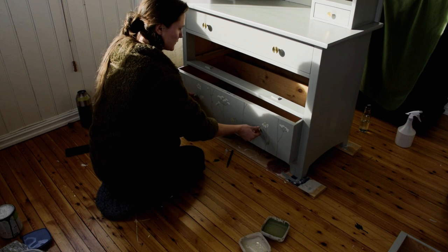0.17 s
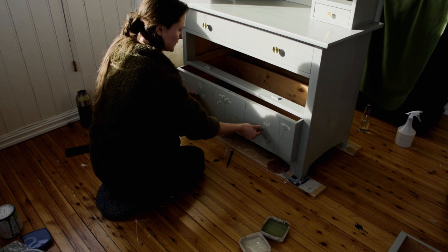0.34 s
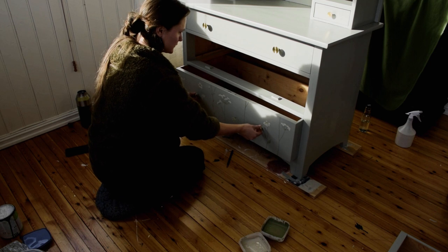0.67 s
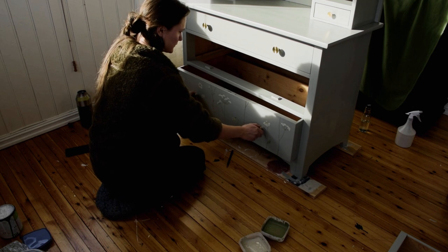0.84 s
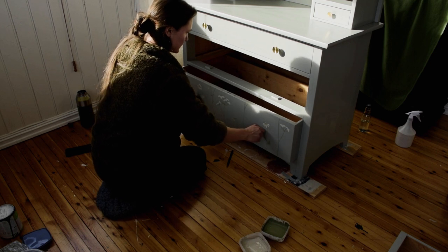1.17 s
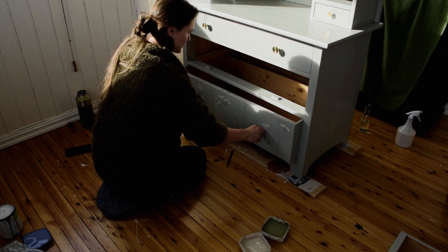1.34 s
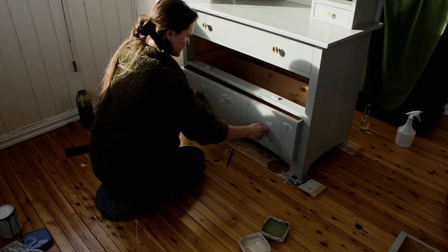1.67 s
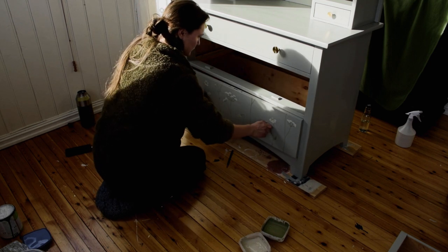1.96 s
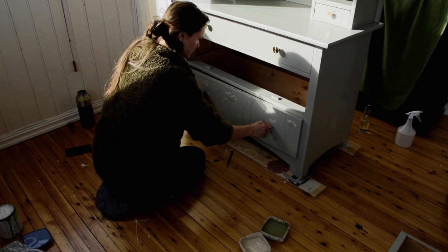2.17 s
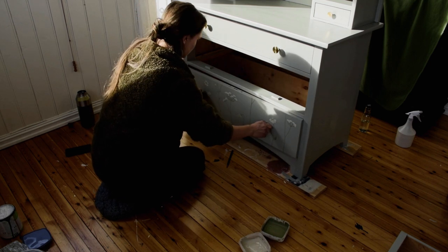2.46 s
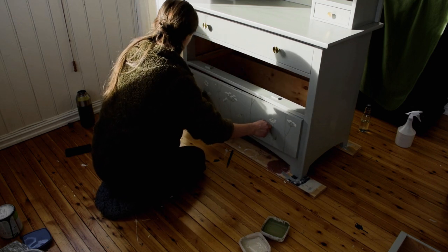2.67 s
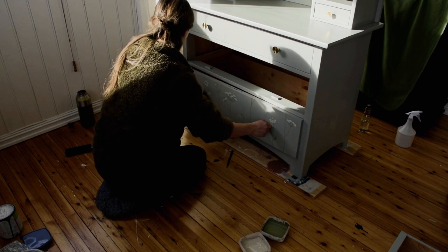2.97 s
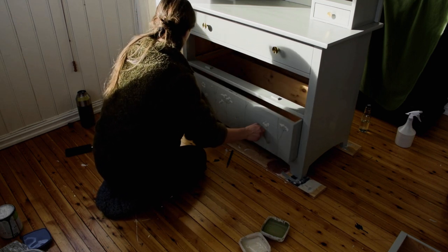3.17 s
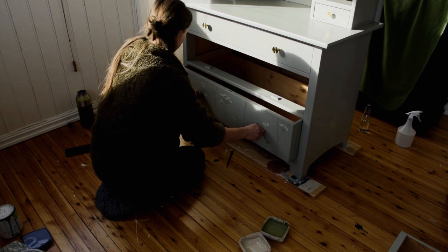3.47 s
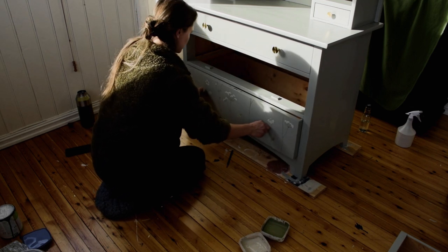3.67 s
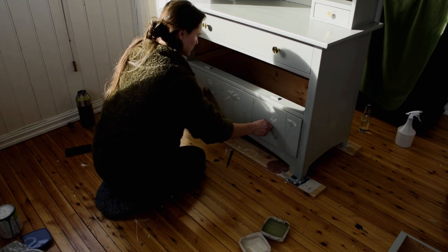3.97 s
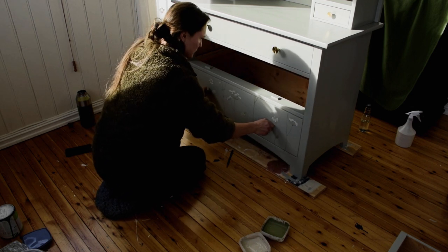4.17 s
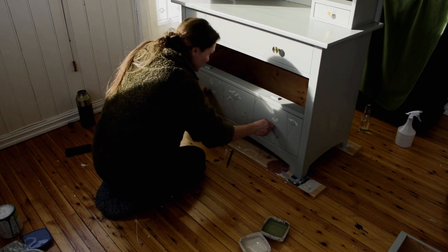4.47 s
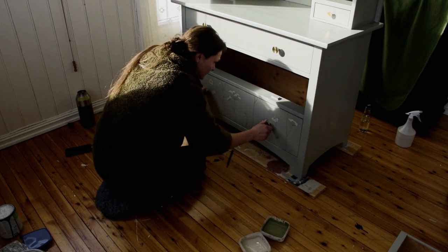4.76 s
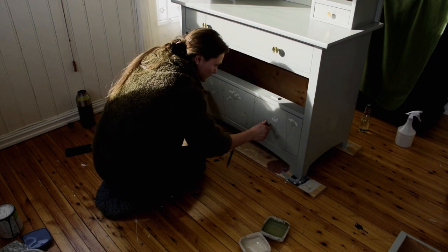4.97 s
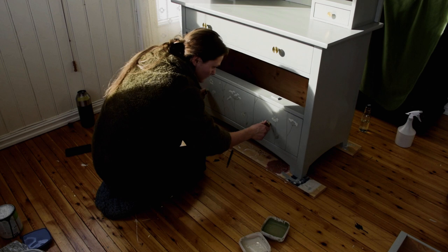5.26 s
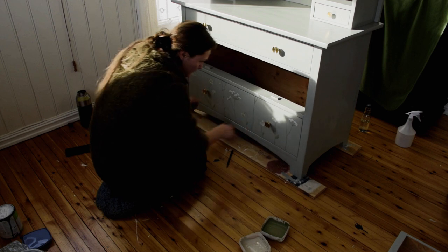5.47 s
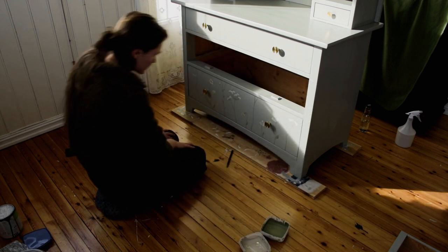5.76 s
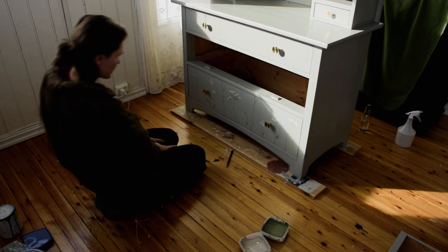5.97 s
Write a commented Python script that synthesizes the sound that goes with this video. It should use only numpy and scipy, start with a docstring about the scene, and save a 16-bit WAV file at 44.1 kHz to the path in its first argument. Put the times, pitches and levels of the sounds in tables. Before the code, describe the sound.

A wooden drawer is pushed and pulled in a hollow dresser in a quiet, board-floored room. Short dry scrapes and dull bumps come first, then sharp clacks and heavy thuds in uneven bursts, hardest between one and four seconds. Softer knocks and small taps follow, then a faint cloth brush. The microphone is a few steps away, with short room reverberation and soft steady hiss.

```python
"""A wooden drawer is pushed and pulled by its knobs in a dresser, in a quiet, bare room with a board floor.
From the start it scrapes on its runners by stick-slip, judders and thuds into the hollow carcass,
whose damped modes ring, and clacks against the frame in broadband snaps that ring its edges; the hardest
blows fall between one and four seconds. Lighter knocks follow, then cloth brushes by as smooth noise.
Steady hiss lies beneath, and the walls return a decaying noise tail."""
import sys
import numpy as np
from scipy import signal
from scipy.fft import rfft, irfft, next_fast_len
from scipy.io import wavfile
from scipy.ndimage import map_coordinates

SR = 44100
rng = np.random.default_rng(int(sys.argv[2]) if len(sys.argv) > 2 else 0)


def waveform_to_disk(signal):
    """Save audio, clipped to [-1, 1], as 16-bit WAV at the path in sys.argv[1]."""
    frames = np.transpose(np.atleast_2d(signal))
    scaled = np.clip(frames, -1, 1) * 32767
    samples = np.round(scaled).astype(np.int16)
    wavfile.write(sys.argv[1], SR, samples)


def ratio(d):
    """dB to gain"""
    e = np.asarray(d, float) / 20
    return 10 ** e


N = 269892  # length in samples

# Carcass and panel modes. Each row: frequency in Hz, bandwidth in Hz, relative gain in dB.
CARCASS_MODES = [(81, 37, 6), (118, 9.6, 5.5), (148.5, 25, 3.5), (190, 88, -1.5), (221.5, 5.4, 3),
                 (277.3, 9, -0.5), (308, 8, 1), (380, 33, -6.5), (422, 37, -3), (552, 13, -10),
                 (642, 24, -7.5), (847, 290, -7)]
# Modes of the drawer edges and knobs. Each row: frequency in Hz, bandwidth in Hz, relative gain in dB.
EDGE_MODES = [(1590, 170, 5.5), (1860, 310, 2), (2500, 130, 1), (3130, 1400, 2.5), (3860, 250, -18.5),
              (4480, 240, -3.5)]


def unit(x):
    """Normalisation to a root-mean-square value of 1."""
    return x / np.sqrt(np.mean(x ** 2) + 1e-20)


def along(points, hz):
    """Linear interpolation of (Hz, value) points on a logarithmic frequency axis."""
    f, v = np.transpose(points)
    return np.interp(np.log(hz + 1), np.log(f + 1), v)


def filtered(x, response):
    """Linear filtering: the spectrum of x times a complex response of frequency."""
    m = next_fast_len(len(x) + SR // 2)
    spectrum = rfft(x, m) * response(np.fft.rfftfreq(m, 1 / SR))
    return irfft(spectrum, m)[:len(x)]


def modes(table):
    """Modal superposition: a causal sum of damped resonances with alternating sign."""
    def response(f):
        total = 0
        for k, (centre, width, db) in enumerate(table):
            resonance = 1j * f * width / (centre * centre - f * f + 1j * f * width)
            total = total + (-1) ** k * ratio(db) * resonance
        return total
    return response


def above(corner_hz):
    """Second-order causal high-pass: two equal first-order sections."""
    return lambda f: (1j * f / (corner_hz + 1j * f)) ** 2


def below(corner_hz):
    """Second-order causal low-pass: two equal first-order sections."""
    return lambda f: (corner_hz / (corner_hz + 1j * f)) ** 2


def catches(per_s, spread_db):
    """Stick-slip friction: tiny impulses at random moments, of random sign and uneven size."""
    hit = rng.random(N) < per_s / SR
    sign = np.sign(rng.standard_normal(N))
    return hit * sign * ratio(spread_db * np.clip(rng.standard_normal(N), -2, 2))


def strokes():
    """Sliding envelope: each stroke bites, runs, stops and creeps; only the loudest at each moment is kept."""
    # Strokes of the drawer on its runners. Each row: start in seconds, length in seconds,
    # scrape level at the start in dB, scrape level at the end in dB, treble gain in dB.
    pulls = [(0, 0.086, -48.5, -53.5, -0.5), (0.231, 0.09, -55, -33.5, 0), (0.736, 0.64, -67, -81, 7),
             (1.204, 0.37, -40.5, -61, -30.5), (1.621, 0.15, -40, -27.5, 1), (2.779, 0.008, -46, -49.5, 3),
             (2.966, 0.18, -67.5, -59, -3), (3.103, 0.1, -38, -42, 4.5), (3.198, 0.013, -24, -21, 10),
             (3.503, 0.15, -50.5, -35.5, 8), (3.716, .55, -49.5, -57.5, 6), (4.499, 0.033, -53.5, -59, -22),
             (4.649, 0.13, -66, -58.5, -9.5), (5.089, 0.082, -67, -61.5, 4.5),
             (5.305, 0.14, -74, -68.5, 11)]
    grab_db_per_s, stop_db_per_s = 1202, 344.5  # how fast a stroke bites and lets go
    creep_db, creep_db_per_s = -15.5, 77  # after a stroke the drawer creeps on, fading
    s, length, first_db, last_db, bright_db = np.transpose(pulls)[:, :, None]
    t = np.arange(N) / SR - s
    after = np.maximum(t - length, 0)
    lost_db = np.minimum(stop_db_per_s * after, creep_db_per_s * after - creep_db)
    run_db = first_db + (last_db - first_db) * np.clip(t / length, 0, 1)
    level_db = run_db + grab_db_per_s * np.minimum(t, 0) - lost_db
    bright_db = bright_db - lost_db  # the sound dulls as it fades
    loudest = level_db.argmax(axis=0)[None]
    return [np.take_along_axis(v, loudest, axis=0)[0] for v in (level_db, bright_db)]


def scrape():
    """Stick-slip excitation: dense fibre catches hiss, and coarser slips rumble in the carcass modes."""
    # Spectrum of the scrape. Each row: frequency in Hz, relative density in dB per Hz.
    grit_spectrum = [(120, -51), (200, -11.5), (227, -7.5), (359, -6), (431, -8.5), (1860, -16.5),
                     (15800, -50.5)]
    level_db, bright_db = strokes()
    # grips and lets go some 70 times a second
    grip = map_coordinates(rng.standard_normal(N // 600 + 4), [np.arange(N) / 600])
    chatter = ratio(3.5 * grip)
    wood = lambda f: ratio(along(grit_spectrum, f)) * (1 + 0.043 * abs(modes(EDGE_MODES)(f)))
    grit = filtered(chatter * catches(3000, spread_db=3.0), wood)
    low = filtered(grit, lambda f: 1 / (1 + (f / 3500) ** 2))
    hiss = ratio(level_db) * (low + ratio(bright_db) * (grit - low)) / np.std(grit)

    slips = filtered(catches(360, spread_db=6.5), below(520))
    rumble_db = 0.73 * level_db - 12.5  # the rumble swells less than the scrape
    carcass = modes(CARCASS_MODES)
    rumble = filtered(ratio(rumble_db) * slips, carcass) / np.std(filtered(slips, carcass))
    return hiss, rumble


def thuds():
    """Modal excitation: a quick run of blunt pushes; where a bump lands decides which panels ring."""
    # Blunt bumps into the carcass. Each row: start in seconds, peak level in dB,
    # centre of the panels moved in Hz, length of the bump in seconds.
    bumps = [(0.023, -29, 100, 0.055), (0.189, -33.5, 432, 0.012), (0.266, -31, 195, 0.026),
             (.3, -20.5, 125, 0.036), (.39, -33.5, 273, 0.037), (0.577, -35.5, 190, .07),
             (0.721, -47, 292, 0.12), (1.009, -51, 350, 0.049), (1.138, -22, 214, 0.017),
             (1.176, -20, 198, 0.021), (1.2, -17, 233, 0.03), (1.702, -17.5, 98, 0.063),
             (1.764, -10, 269, 0.055), (1.794, -15.5, 133, .04), (2.409, -43, 190, 0.03),
             (2.704, -44.5, 378, 0.017), (2.783, -25, 190, .012), (2.828, -28, 205, 0.019),
             (2.92, -37, 120, 0.06), (3.187, -9.5, 383, 0.078), (3.243, -19.5, 94, 0.086),
             (3.558, -32.5, 286, 0.0227), (3.609, -17, 95, 0.037), (3.635, -25.5, 664, 0.088),
             (3.64, -20, 119, 0.046), (4.238, -33, 194, 0.034), (4.262, -36.5, 514, 0.051),
             (4.467, -36.5, 170, 0.05), (4.619, -38, 705, 0.027), (5.139, -60, 272, 0.03),
             (5.275, -41.5, 200, 0.047), (5.47, -60, 399, .014)]
    # Rocking that sets a single panel humming. Each row: start in seconds, peak level in dB,
    # panel frequency in Hz, length in seconds.
    hums = [(1.288, -32.5, 118, .056), (4.738, -52.5, 190, 0.078), (4.785, -47, 308, 0.0465),
            (5.305, -48, 434, 0.042)]
    # Floor boards ringing on under the dresser. Each row: frequency in Hz, bandwidth in Hz, relative gain in dB.
    boards = [(71.25, 1.4, 8), (86.8, 2.3, 9)]
    out, t = np.zeros(N + SR), np.arange(SR) / SR
    body = lambda f: modes(CARCASS_MODES)(f) + sum(modes([board])(f) for board in boards)
    # spread: bandwidth of the selecting resonance as a share of its centre
    events = [(*row, 1.33) for row in bumps] + [(*row, 0.12) for row in hums]
    for s, db, hz, length, spread in events:
        pushes = np.sin(np.pi * np.clip(t / length, 0, 1) ** 0.5) * rng.standard_normal(len(t))
        # the firmest push sounds every panel evenly
        pushes[round(.3 * length * SR)] = 1.1 * np.linalg.norm(pushes)
        place = modes([(hz, spread * hz, 0)])
        ring = filtered(pushes, lambda f: body(f) * place(f) ** 2)
        out[round(s * SR):][:len(t)] += ratio(db) * ring / abs(ring).max()
    return out[:N]


def clacks(firm, crackle, ring):
    """Impact excitation: snap and crackle ring the edges; each has its own share of treble spit and panel knock."""
    # Sharp wood-on-wood contacts. Each row: start in seconds, relative level in dB,
    # relative treble gain in dB, relative panel gain in dB, edge mode struck most in Hz.
    contacts = [(0.185, -44.5, -22, 6.5, 1770), (0.3005, -30, -38, 4, 1660), (0.7215, -52, -25, 3, 1620),
                (0.805, -57.5, -2, -13.5, 3920), (1.1391, -12, 0, -1, 1890), (1.238, -26, -46.5, 0.5, 2500),
                (1.417, -46, -30, 1, 3130), (1.6098, -29.5, -29, 8.5, 1620), (1.663, -16.5, -39, -12, 2440),
                (1.7478, -18, -41, -10, 2960), (1.7585, -21.5, -23.5, -14, 4440),
                (1.7821, -36.5, -31.5, 15.5, 1550), (2.0587, -47, 4, -19, 4080),
                (2.395, -55, -25, 14, 1617), (2.6323, -54, -19, 7.5, 2600), (2.6666, -50.5, -26, 5, 1830),
                (2.7728, -44.5, -11.5, 7, 2000), (2.838, -52.5, -28.5, 14, 1600), (3.1, -39, -14, -3, 1580),
                (3.1124, -21.5, 3.5, -12.5, 1600), (3.19, -26.5, -20, -10.5, 2260),
                (3.2201, -10.5, -7.5, -11.5, 2060), (3.233, -15.5, -17, -6, 2290),
                (3.5143, -54, -22.5, 5, 2820), (3.5663, -32, -39, -21, 1770), (4.469, -54.5, -24, 11, 1610),
                (4.6122, -40, -37, 0, 3490), (4.635, -55, -25, 8, 1583), (4.712, -58, -26, 9, 1450),
                (4.747, -64, -30, -6, 1980), (4.803, -47, -36, -0.5, 1890),
                (5.239, -52.5, -24.5, 13.5, 1900)]
    out, t = np.zeros(N + SR), np.arange(SR // 10) / SR
    treble = lambda f: above(4500)(f) * below(9000)(f) ** 2
    panels = lambda f: above(350)(f) * below(1600)(f) ** 2
    for s, db, bright_db, dull_db, hz in contacts:
        crack = crackle * ratio(-60 * t / 0.056) * rng.standard_normal((3, len(t)))
        crack *= 1 - np.exp(-t / (.0005 - .00004 * db))  # light taps start softer
        crack[:, 0] = firm * ratio(0.038 * db)  # and have less snap
        # a hard blow presses the parts together and smears their ring
        damping = np.clip(2.0 + db / 26, .3, 2)
        # no two contacts land on the same spot
        shift = rng.standard_normal((len(EDGE_MODES), 2))
        moved = [(c * (1 + .02 * a), w * damping, g + 1.5 * b - 10 * np.log10(damping))
                 for (c, w, g), (a, b) in zip(EDGE_MODES, shift)]
        edges = lambda f: sum(modes([mode])(f) for mode in moved)
        struck = modes([(hz, 150 * damping, 3.0 - 0.24 * db)])  # a light tap rings one spot clearly
        wood = lambda f: (1 + ring * (edges(f) + struck(f))) * above(1200)(f) * below(5500)(f) ** 2
        snap = ratio(19) * filtered(crack[0], wood)
        spit = ratio(bright_db + 22.5) * filtered(crack[1], treble)
        knock = ratio(dull_db + 37.5) * filtered(crack[2], panels)
        out[round(s * SR):][:len(t)] += ratio(db) * (snap + spit + knock)
    return out[:N]


def brush():
    """Broadband friction noise: cloth dragged lightly gives a smooth, bright hiss that swells and sags."""
    # Spectrum of the cloth. Each row: frequency in Hz, relative density in dB per Hz.
    cloth_spectrum = [(290, -52), (500, -7), (1440, -4), (15800, -13.5)]
    start_s, rise_s, crest_s = 5.67, 0.0314, 5.84
    crest_db, sag_db_per_s = -58.5, 34  # level at the crest, fall either side
    t = np.arange(N) / SR
    onset = np.clip((t - start_s) / rise_s, 0, 1)
    sweep = onset * ratio(crest_db - sag_db_per_s * abs(t - crest_s))
    return sweep * unit(filtered(rng.standard_normal(N), lambda f: ratio(along(cloth_spectrum, f))))


def room(x, wet_db):
    """Reverberation as noise decaying by band; each stretch of 0.2 s excites the room from a new spot."""
    # Decay of the room. Each row: frequency in Hz, reverberation time (60 dB) in seconds.
    decay = [(70, 0.66), (160, 0.31), (420, 0.44), (1100, 0.41), (2900, 0.44), (7700, 0.31), (14000, 0.017)]
    out, size = np.zeros(N + 2 * SR), SR // 5
    for start in range(0, N, size):
        hz, t, z = signal.stft(rng.standard_normal(SR * 4 // 5), SR, nperseg=256)
        fade = ratio(-60 * t / along(decay, hz)[:, None])
        tail = signal.istft(z * fade, SR, nperseg=256)[1]
        wet = signal.fftconvolve(x[start:start + size], tail / np.linalg.norm(tail))
        out[start + 180:][:len(wet)] += wet  # first wall 4 ms later
    return ratio(wet_db) * out[:N]


def hush():
    """Stationary coloured noise: the steady hiss of room and microphone."""
    # Spectrum of the background. Each row: frequency in Hz, relative density in dB per Hz.
    hush_spectrum = [(15, -32), (25, 3), (76, -0.5), (179, -5), (248, -7.5), (307, -1.5), (1120, -17),
                     (4820, -22.5), (14600, -24), (15800, -20.5)]
    return ratio(-65) * unit(filtered(rng.standard_normal(N), lambda f: ratio(along(hush_spectrum, f))))


def scene():
    """Direct and reverberant sound add: edges ring straight, the walls get a cleaner, firmer snap with less ring."""
    # the dresser stands a few steps off
    grit, rumble = scrape()
    body = thuds() + rumble
    rub = grit + brush()
    direct_snaps = ratio(-11.5) * clacks(firm=0.13, crackle=0.24, ring=3.09)
    wall_snaps = room(clacks(firm=0.58, crackle=0.049, ring=1.0), wet_db=-1)
    wall_body = room(filtered(body, above(90)), wet_db=-4)
    wall_rub = room(rub, wet_db=-4.0)
    return (direct_snaps + wall_snaps + body + wall_body + rub + wall_rub + hush())[None]


def band_limit(x):
    """A steep low-pass at the top of the band."""
    return signal.sosfilt(signal.butter(12, 16430, fs=SR, output="sos"), x)


def record(dry):
    """Band limitation: a gentle high-pass drops the deep bass, and a sharp edge ends the treble."""
    band = lambda hz: (hz < 15800) * above(30)(hz)
    mix = filtered(dry[0], band)[None]
    return band_limit(mix)


dry = scene()
out = record(dry)
waveform_to_disk(out)
```